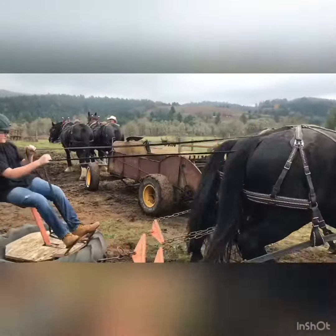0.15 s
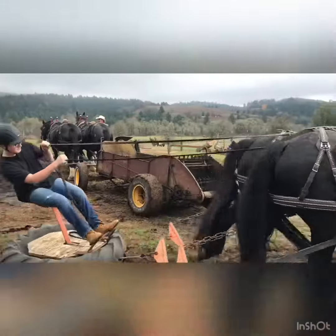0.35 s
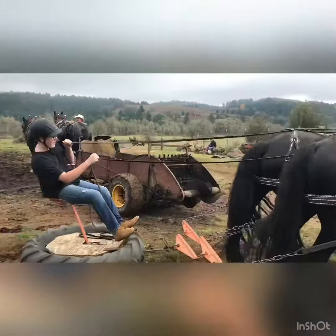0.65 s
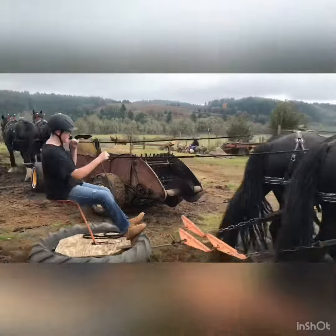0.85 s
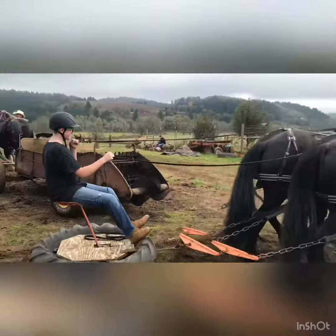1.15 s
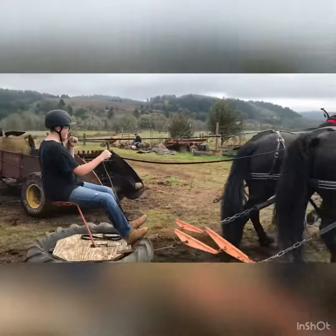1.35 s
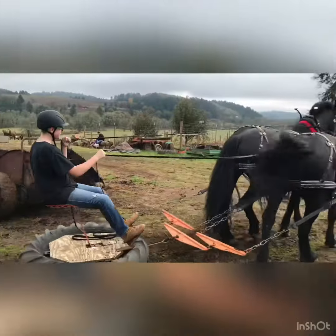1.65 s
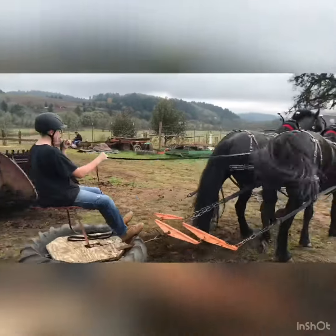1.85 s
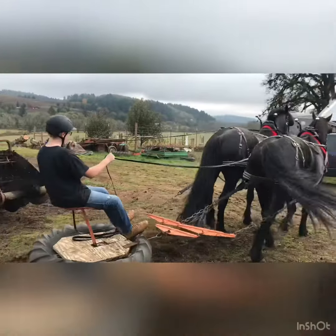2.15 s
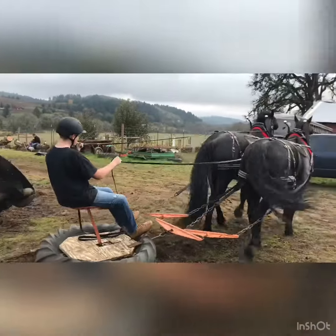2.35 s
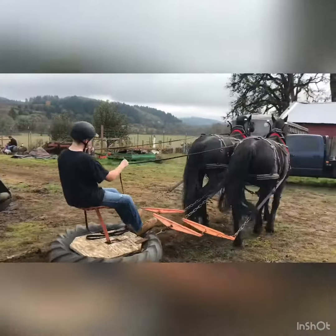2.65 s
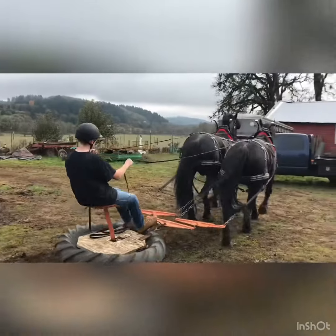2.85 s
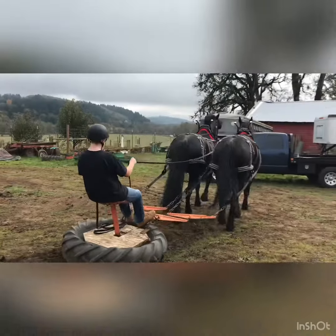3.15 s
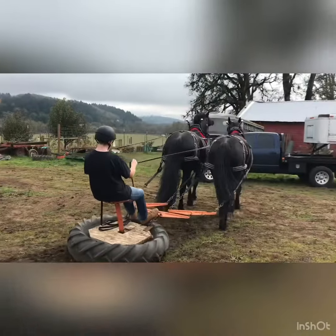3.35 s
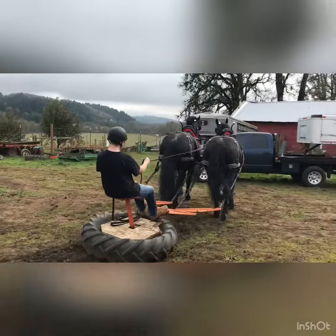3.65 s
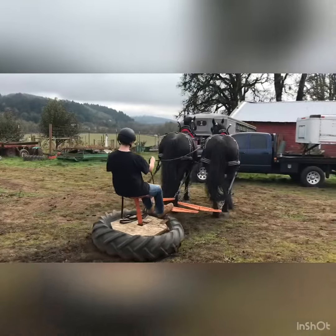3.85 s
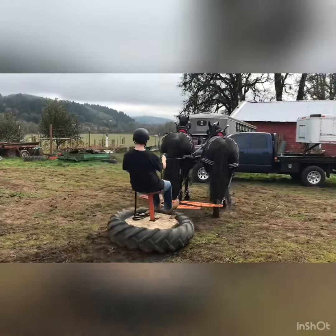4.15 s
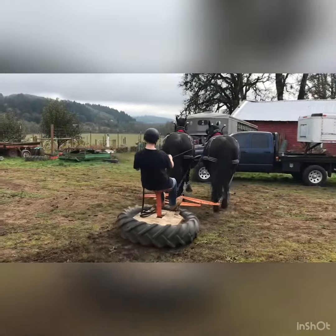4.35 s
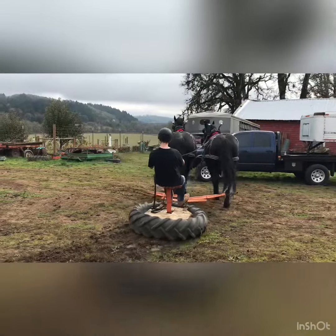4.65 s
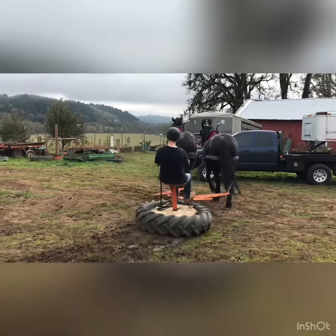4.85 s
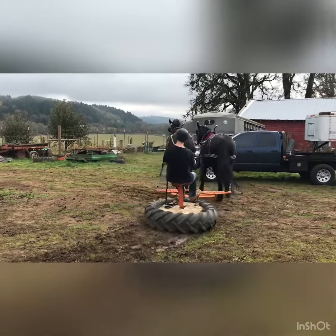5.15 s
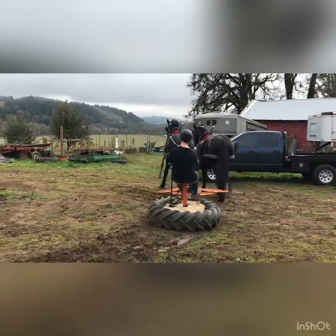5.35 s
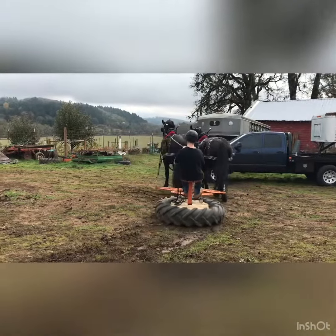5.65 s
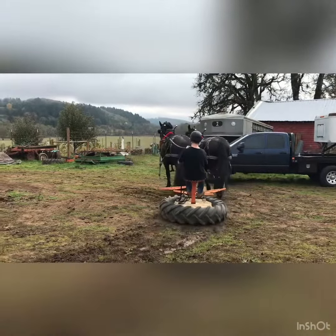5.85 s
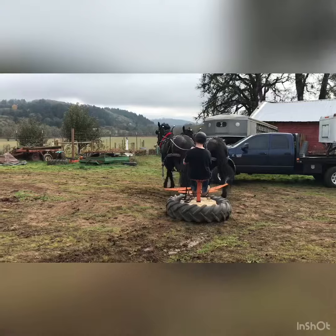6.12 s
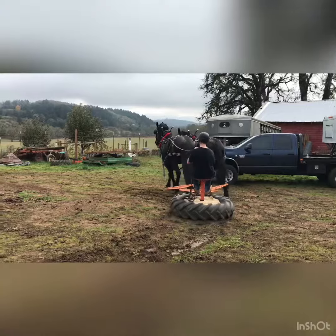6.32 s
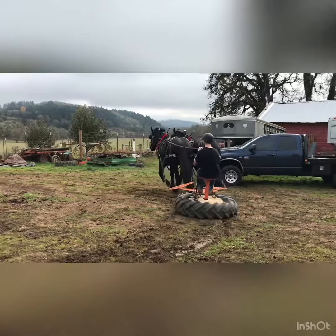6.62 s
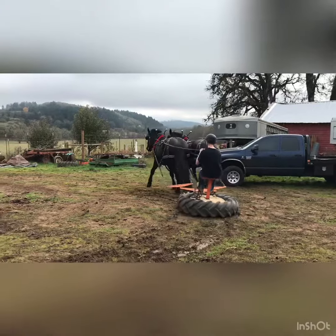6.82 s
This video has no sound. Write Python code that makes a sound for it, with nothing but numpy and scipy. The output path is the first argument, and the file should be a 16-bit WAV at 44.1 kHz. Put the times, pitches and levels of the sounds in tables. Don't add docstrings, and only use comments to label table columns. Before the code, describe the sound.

Loose steel bars and chain clank sharply and irregularly as a horse-drawn tyre sled rumbles and scrapes away over turf with soft hoof thumps.

```python
import sys
import numpy as np
from scipy import signal
from scipy.fft import rfft, irfft, next_fast_len
from scipy.io import wavfile
from scipy.ndimage import uniform_filter1d, map_coordinates

SR = 44100
rng = np.random.default_rng(int(sys.argv[2]) if len(sys.argv) > 2 else 0)


def linear_from_db(decibels):
    return 10 ** (np.asarray(decibels, float) / 20)


def wav_record(signal):
    frames = np.transpose(np.atleast_2d(signal))
    bounded = np.clip(frames, -1, 1)
    quanta = np.round(bounded * 32767).astype(np.int16)
    wavfile.write(sys.argv[1], SR, quanta)


N = 307818


def unit(x):
    return x / np.sqrt(np.mean(x ** 2) + 1e-20)


def along(points, hz):
    f, v = np.transpose(points)
    return np.interp(np.log(hz + 1), np.log(f + 1), v)


def wobble(rate_hz):
    knots = rng.standard_normal(int(N * rate_hz / SR) + 4)
    return map_coordinates(knots, [np.arange(N) * rate_hz / SR])


def filtered(x, response):
    m = next_fast_len(x.shape[-1] + 4096)
    spectrum = rfft(x, m) * response(np.fft.rfftfreq(m, 1 / SR))
    return irfft(spectrum, m)[..., :x.shape[-1]]


def fading(t, t60_s, rise_s):
    return linear_from_db(-60 * t / max(t60_s, .003)) * (1 - np.exp(-t / max(rise_s, 1e-5)))


def add(track, s, sound):
    part = track[round(s * SR):][:len(sound)]
    part += sound[:len(part)]


def rush(spectrum, patchy_db):
    z = signal.stft(rng.standard_normal(N), nperseg=512)[2]
    field = uniform_filter1d(rng.standard_normal(z.shape), 12, 0)
    field = uniform_filter1d(field, 6, 1)
    x = signal.istft(z * linear_from_db(patchy_db * unit(field)), nperseg=512)[1][:N]
    return unit(filtered(x, lambda hz: linear_from_db(along(spectrum, hz))))


def tyre():
    # t/s, tyre load/dB, brushed grass/dB
    drag = [(0, -40.5, -60.5), (.6, -41, -58.5), (1.2, -44.5, -62.5), (1.8, -42.5, -58.5), (2.2, -42, -60),
            (2.36, -45, -66), (2.8, -44, -62.5), (3.5, -44, -66.5), (4.35, -46, -72), (4.85, -48, -69),
            (5.5, -49.5, -76), (6.98, -47, -75.5)]
    # f/Hz, density/dB
    rumble_colour = [(25, -87), (45, -8), (75, 4), (98, -6.5), (113, -9), (156, -19.5), (220, -35.5),
                     (330, -100)]
    scrape_colour = [(76, -49), (130, -4), (208, -9.5), (460, -16.5), (941, -18), (2500, -29),
                     (3250, -33.5), (5500, -120)]
    hiss_colour = [(880, -25.5), (1500, -6.5), (4370, -1.5), (4970, -7), (6120, -4), (9280, -6),
                   (10500, -11), (11500, -9.5)]
    start_m, leaves_m_per_s = 5.6, 1.05
    t = np.arange(N) / SR
    s, *cols = np.transpose(drag)
    rumble_db, fine_db = [np.interp(t, s, c) for c in cols]
    far_db = -20 * np.log10(1 + leaves_m_per_s / start_m * t)
    scrape_db = -51.5 + 0.67 * (rumble_db - rumble_db.mean()) + 0.53 * far_db
    hiss_db = -56.5 + 0.19 * (fine_db - fine_db.mean()) + 1.075 * far_db

    jolt = wobble(13)
    rumble = linear_from_db(rumble_db + 1.8 * wobble(9.5)) * rush(rumble_colour, patchy_db=-0.7)
    scrape_gain = linear_from_db(scrape_db + 1.0 + 0.99 * jolt + 1.38 * wobble(60))
    scrape = scrape_gain * rush(scrape_colour, patchy_db=1.2)
    crackle = linear_from_db(1.28 * rng.exponential(size=N // 64 + 1).repeat(64)[:N])
    grass = crackle * rush(hiss_colour, patchy_db=.4)
    fine = filtered(grass, lambda f: 1 / (1 + (6500 / (f + 1)) ** 6))
    flutter = linear_from_db(.7 * jolt + 1.1 * wobble(53))
    hiss = flutter * (linear_from_db(hiss_db) * unit(grass - fine) + linear_from_db(fine_db + 3.0) * unit(fine))
    return rumble + scrape + hiss


def knocks():
    # t/s, peak/dB, f/Hz, cycles to -60 dB
    steel_touches = [(0.015, -37, 2210, 18), (.159, -44, 1200, 14), (.185, -40, 1600, 9),
                     (2.2089, -5, 1670, 11), (.63, -17, 1900, 13), (3.4238, -22, 2700, 10),
                     (5.9718, -13, 2200, 9), (1.4222, -36, 3600, 22), (3.584, -46, 2500, 14),
                     (2.2442, -9, 1700, 18), (3.4471, -22, 2500, 12), (4.5609, -29.5, 1190, 25),
                     (4.6445, -37, 3500, 7), (5.9859, -14.5, 1420, 12), (6.8371, -29, 1090, 13),
                     (3.0143, -33, 7060, 20), (5.5757, -48, 3800, 16), (6.785, -47, 3500, 17.5),
                     (1.609, -44, 2900, 30), (2.0288, -40, 3900, 18), (2.303, -42, 7000, 20),
                     (2.4, -35, 4000, 4), (3.1, -40, 3500, 30), (2.7017, -37, 3300, 5),
                     (2.715, -38, 930, 10), (2.725, -40, 3100, 20), (2.744, -43, 3600, 20),
                     (2.465, -42, 2200, 14), (2.475, -42, 1600, 20), (4.6, -34, 1730, 12),
                     (4.2, -36, 1000, 4), (2.8, -34, 8500, 8), (2.864, -44, 6500, 12)]
    # t/s, peak/dB, f/Hz
    slack_links = [(.58, -37, 940), (.609, -38, 930), (.717, -40, 4300), (.722, -39, 3390),
                   (.726, -38, 1910), (.731, -33, 1470), (.74, -32, 1800), (.748, -38, 2100),
                   (.774, -36, 1500), (.785, -43, 1350), (.794, -36, 2300), (.803, -35, 880),
                   (.819, -38, 2500), (0.8842, -34, 1430), (.89, -39, 2600), (.917, -44, 1900),
                   (.946, -45, 950)]
    # t/s, peak/dB, f/Hz
    clods = [(.221, -38, 400), (.58, -32, 230), (.735, -32, 240), (.733, -38, 580), (.912, -42, 450),
             (1.61, -36, 220), (1.628, -39, 420), (2.217, -35, 200), (2.45, -34, 200), (2.562, -43, 220),
             (2.735, -35, 380), (2.832, -39, 370), (2.836, -39, 210), (2.872, -45, 420), (2.985, -41, 200),
             (3.041, -39, 240), (3.345, -41, 400), (3.435, -43, 450), (3.691, -37, 260), (3.75, -43, 200),
             (3.945, -46, 200), (4.021, -41, 210), (4.562, -38, 420), (5.153, -42, 220), (5.934, -43, 200),
             (6.76, -45, 420)]
    touches = list(steel_touches)
    touches += [(*row, 30) for row in slack_links]
    touches += [(*row, 9) for row in clods]
    out, t = np.zeros(N), np.arange(SR // 20) / SR
    for s, db, hz, cycles in touches:
        add(out, s, linear_from_db(db + 0.5) * np.sin(2 * np.pi * hz * t) * fading(t, cycles / hz, .0001))
    return out


def link_rings():
    # t/s, level/dB, f/Hz, t60/s
    lone_links = [
        (.036, -38, 1330, .1),
        (.036, -37, 1733, .06),
        (.61, -41, 904, .08),
        (.82, -40, 1427, .09),
        (.886, -46, 1400, .3),
        (.886, -49, 759, .3),
        (3.563, -53, 5303, .22),
        (6.516, -53, 1373, .19),
        (6.516, -55, 2616, .2),
        (6.516, -58, 2492, .1),
    ]
    # t/s, level/dB, f/Hz, t60/s
    clank_modes = [(5.9708, -13, 3045, .08), (2.2445, -24, 3260, .09), (2.209, -30, 4465, .1),
                   (2.209, -26, 1680, .08), (3.4225, -20, 2060, .035), (3.423, -32, 3200, .05),
                   (3.446, -33, 2153, .09), (5.972, -27, 1150, .06), (6.01, -47, 4600, .2),
                   (6.02, -38, 1640, .12), (3.424, -49, 5420, .1), (5.9715, -24, 1660, .08),
                   (5.978, -31, 2917, .15), (5.98, -31, 1480, .16), (5.984, -24, 2636, .14),
                   (5.986, -33, 2565, .2), (5.986, -32, 1690, .16), (5.994, -36, 2840, .25),
                   (6.002, -38, 6043, .08), (6.04, -46, 3045, .2), (6.057, -52, 6043, .15),
                   (4.566, -28, 6029, .05), (4.566, -40, 7149, .06), (4.567, -33, 4264, .05),
                   (4.567, -37, 2183, .09), (4.573, -32, 1820, .035), (2.199, -44, 3040, .3)]
    # t/s, level/dB, f/Hz, t60/s
    more_clank_modes = [(2.209, -30, 3817, .12), (2.209, -35, 4587, .12), (2.245, -34, 619, .2),
                        (2.245, -39, 1432, .2), (2.245, -37, 1550, .2), (3.423, -42, 743, .1), (3.423, -32, 1825, .08),
                        (3.423, -39, 2546, .1), (3.423, -43, 3871, .1), (3.447, -41, 2762, .2), (3.447, -45, 1346, .2),
                        (3.447, -43, 1696, .2), (3.447, -53, 2632, .2), (3.447, -52, 4613, .2),
                        (4.566, -38, 4705, .09), (4.566, -37, 5265, .09), (4.566, -30, 7036, .06),
                        (4.566, -50, 11360, .13), (4.566, -54, 10034, .16), (4.566, -55, 11811, .17),
                        (5.971, -32, 7612, .1), (5.971, -36, 6412, .1), (5.971, -33, 3402, .1), (5.971, -37, 5814, .1),
                        (5.995, -37, 1836, .2), (6.06, -62, 4048, .5), (6.06, -62, 4194, .5), (6.25, -61, 2650, .25),
                        (6.1, -63, 1927, .4)]
    out, t = np.zeros(N), np.arange(SR // 5) / SR
    for rows in (lone_links, clank_modes, more_clank_modes):
        for s, db, hz, t60_s in rows:
            add(out, s, linear_from_db(db) * np.sin(2 * np.pi * hz * t) * fading(t, t60_s, .002))
    return out


def jingles(count):
    when, size, pitch = rng.random((count, 3)).T
    s = when * N / SR
    level_db = -59 - 1.5 * s - 6 * size
    return list(zip(s, level_db, 3200 * 2 ** (2 * pitch - 1)))


def ticks():
    # t/s, rms/dB, f/Hz
    grit = [(0.152, -42, 5330), (0.395, -44, 6320), (0.444, -39, 5060), (1.076, -45, 5860),
            (2.448, -46, 3600), (2.567, -46, 4870), (3.0145, -52, 7450), (4.255, -54, 7980),
            (4.644, -52, 3600), (5.83, -58, 6920)]
    rattle = [(0.562, -46, 8900), (0.715, -44, 3540), (0.786, -47, 2650), (0.884, -48, 2500),
              (1.4225, -49, 3800), (2.576, -54, 3600), (2.712, -52, 3300), (2.863, -54, 6810),
              (3.368, -49.5, 2370), (4.468, -52, 2640), (5.625, -64.5, 6130), (6.599, -48.5, 2130)]
    swish = [(1.175, -52.5, 5200), (2.7, -55.5, 5500), (2.83, -53, 8110)]
    buckle = [(0.725, -54, 3350), (3.057, -52.5, 4380), (3.422, -38, 3380), (3.684, -54.5, 4430),
              (3.748, -52, 4300), (4.081, -56.5, 8400), (4.081, -47, 5900), (4.93, -56.5, 4300),
              (6.058, -60, 11740), (6.4, -60, 4400), (6.476, -58, 4380)]
    taps = [(0.0362, -33.5, 1230), (0.795, -35, 1030), (0.916, -41, 1130), (0.949, -47, 810),
            (2.448, -43.5, 580), (2.738, -45.5, 530), (3.346, -43, 710), (4.016, -46, 1580),
            (5.576, -55, 1270), (6.329, -48, 841), (6.838, -50, 1060)]
    tumbles = [(0.578, -48, 935), (0.609, -56, 950), (0.722, -47, 1640), (0.733, -48, 1500),
               (0.778, -43, 1080), (0.815, -54, 1700), (0.884, -47.5, 1460), (1.041, -55.5, 1140),
               (2.47, -54.5, 1800), (2.833, -54, 950), (3.692, -65, 640)]
    # spread as share of f, t60/s, rise/s
    rattle_kind = (0.27, 0.053, 0.0017)
    kinds = [(grit, (0.39, 0.0098, 0.00056)), (rattle, rattle_kind), (swish, (0.42, 0.14, 0.0024)),
             (buckle, (0.04, 0.043, 0.0016)), (taps, (0.37, 0.022, 0.0011)),
             (tumbles, (0.35, 0.15, 0.0033)), (jingles(count=40), rattle_kind)]
    out, t = np.zeros(N), np.arange(SR // 5) / SR
    for rows, (spread, t60_s, rise_s) in kinds:
        shape = fading(t, t60_s, rise_s)
        for s, db, hz in rows:
            bell = lambda f: np.exp(-(np.log((f + 1) / hz) / (2 * max(spread, .03))) ** 2)
            grains = linear_from_db(3 * rng.standard_normal(len(t) // 90 + 1).repeat(90)[:len(t)])
            puff = shape * filtered(grains * rng.standard_normal(len(t)), bell)
            add(out, s, linear_from_db(db + 6.0) * puff * np.linalg.norm(shape) / np.linalg.norm(puff))
    return out


def hooves():
    # t/s, level/dB, f/Hz
    flat = [(0.222, -25, 79.7), (0.989, -36, 93), (1.476, -41, 63), (1.842, -47, 83), (2.932, -19.5, 81.4),
            (3.089, -46, 68.5), (3.217, -40.5, 77.5), (3.448, -38, 72.7), (3.697, -34.5, 73),
            (4.272, -49, 71.5), (4.721, -38.5, 72.5), (5.076, -42, 75.7), (5.148, -45, 96),
            (5.739, -38, 81.4), (6.097, -47, 75), (6.477, -46.5, 102.4)]
    toe = [(0.039, -35, 57.4), (0.373, -28.5, 74), (0.576, -36.5, 67), (0.729, -41, 58.6),
           (0.772, -31, 85.6), (0.928, -31, 77), (1.165, -37, 86), (1.985, -41, 75.5), (2.438, -41, 115),
           (2.714, -34.5, 87), (3.348, -39, 93)]
    out, t = np.zeros(N), np.arange(SR // 3) / SR
    swell = fading(t, 0.086, 0.016) * (1 - np.exp(-t / 0.013))
    for rows, slap_db in [(flat, -15), (toe, -4)]:
        for s, db, hz in rows:
            cycles = hz * (t + 0.004 * (1 - np.exp(-t / 0.0038)))
            ring = np.sin(2 * np.pi * cycles) * swell / swell.max()
            slap = filtered(rng.standard_normal(len(t)), lambda f: np.exp(-np.log((f + 1) / 280) ** 2 / 0.18))
            slap = linear_from_db(slap_db - 4.0) * unit(slap) * fading(t, 0.093, 0.0052)
            add(out, s, linear_from_db(db) * (1.76 * ring + slap))
    return out


def shiver(t):
    rate_hz, depth_db = 45, 1.5
    knots = rng.standard_normal(int(t[-1] * rate_hz) + 2)
    knots[0] = 0
    return linear_from_db(depth_db * np.interp(t * rate_hz, np.arange(len(knots)), knots))


def bar_ring(t, modes, onset_s, free_s):
    ring = np.zeros(len(t))
    for k, (hz, db, t60_s) in enumerate(modes):
        sign = (-1) ** k
        ring += sign * linear_from_db(db - 2.2) * np.sin(2 * np.pi * hz * t) * fading(t, t60_s, onset_s) * shiver(t)
    return ring * linear_from_db(-400 * np.maximum(t - free_s, 0))


def clustered(modes, f, width_hz, valley_db):
    return linear_from_db(valley_db) + sum(1 / (1 + ((f - hz) / width_hz) ** 2) for hz, _, _ in modes)


def clatter(t, modes, tone, t60_s, onset_s):
    colour = lambda f: linear_from_db(along(tone, f)) * clustered(modes, f, width_hz=50, valley_db=-5)
    noise = unit(filtered(rng.standard_normal(len(t)), colour))
    bright = filtered(noise, lambda f: f / np.hypot(f, 5000))
    dull = (noise - bright) * fading(t, t60_s, onset_s)
    crack = 1.5 * noise * fading(t, 0.012, onset_s / 5)
    return dull + bright * fading(t, .8 * t60_s, onset_s / 2) + crack


def swarm(t, tone, t60_s, count):
    pitch, size, life = rng.random((3, count, 1))
    hz = 1200 * 6 ** pitch
    gain = linear_from_db(along(tone, hz) - 10 * size) * np.sqrt(hz)
    rings = gain * np.sin(2 * np.pi * (hz * t + size)) * fading(t / (.5 + life), t60_s, 0)
    return rings.sum(axis=0) / np.sqrt(np.sum(gain ** 2) / 2)


def bars():
    # f/Hz, level/dB, t60/s
    ring_1 = [(1346, -44.8, 0.23), (1390, -21, 0.055), (1408, -44.9, 0.12), (1782, -32.4, 0.13),
              (2156, -49.7, 0.58), (2624, -37.4, 0.21), (3047, -44.7, 0.33), (3803, -48.3, 0.24),
              (4212, -53.1, 0.41), (4272, -43, 0.83), (5400, -43, 0.13)]
    ring_2 = [(883, -36, 0.12), (1357, -34, 0.17), (1408, -48.8, 0.42), (1785, -29, 0.2), (2148, -37, 0.2),
              (2476, -39.8, 0.12), (2800, -42.2, 0.12), (3031, -45.5, 0.23)]
    ring_3 = [(545, -31, 0.15), (1112, -27.9, 0.42), (1179, -24.5, 0.1), (1830, -14.5, 0.69),
              (2151, -6.1, 0.08), (2619, -26.9, 0.2), (3040, -12, 0.11), (3257, -21.7, 0.14),
              (3701, -22.0, 0.1), (4054, -23.5, 0.08), (4261, -24.3, 0.23), (5214, -36, 0.09),
              (6072, -33.4, 0.1), (7639, -39, 0.14)]
    ring_3_bounce = [(557, -34.1, 0.24), (934, -36.7, 0.22), (1115, -32, 0.36), (1184, -44.3, 0.23),
                     (1682, -26, 0.16), (1833, -26, 0.5), (2151, -20, 0.14), (2557, -39, 0.38),
                     (2627, -25, 0.14), (3036, -24, 0.14), (3709, -26.7, 0.11), (3828, -20.4, 0.07),
                     (4266, -28, 0.17), (4476, -28.8, 0.12)]
    ring_4 = [(1114, -32.5, 0.45), (1577, -33.0, 0.13), (1766, -40.0, 0.22), (1833, -43, 0.5),
              (2153, -30, 0.2), (2762, -48, 0.3), (3055, -52, 0.3), (3262, -44.0, 0.4), (3418, -34, 0.09),
              (4046, -44, 0.4), (4264, -42, 0.33), (6024, -45, 0.2)]
    ring_5 = [(904, -47.0, 0.42), (1359, -37, 0.16), (1822, -41.5, 0.17), (2151, -37, 0.55),
              (2624, -37.7, 0.22), (2821, -56.4, 0.3), (6030, -50, 0.2)]
    ring_6 = [(870, -32, 0.08), (1104, -52, 0.2), (1760, -29, 0.05), (2183, -43.5, 0.14),
              (3219, -40.6, 0.11), (4046, -46.8, 0.3), (4274, -48, 0.3), (5290, -52, 0.19),
              (5817, -46.1, 0.15), (6029, -50, 0.35), (6700, -57, 0.2), (7149, -45.7, 0.21),
              (10900, -58, 0.2), (13100, -56, 0.12)]
    ring_7 = [(1666, -35.9, 0.06), (1782, -38.8, 0.07), (2622, -39.6, 0.14), (3033, -39.8, 0.29),
              (3822, -33.8, 0.04), (4274, -40.8, 0.1), (4740, -38.8, 0.05), (5822, -52.3, 0.16)]
    ring_8 = [(907, -47, 0.25), (1150, -25, 0.16), (1553, -33, 0.25), (1710, -27, 0.1), (1841, -55, 0.9),
              (2155, -39, 0.38), (2568, -30, 0.15), (2580, -54, 0.9), (2641, -27, 0.08), (2850, -26, 0.15),
              (3033, -32, 0.09), (3055, -42, 0.32), (3262, -31, 0.36),
              (3712, -36, 0.3), (3806, -33.8, 0.17), (4268, -22, 0.17), (4280, -42, .38),
                   (4484, -31, 0.26), (4600, -36.8, 0.28), (5006, -37, 0.25), (5346, -27.5, 0.13),
                   (5367, -43, 0.38), (6043, -36, 0.27), (6300, -26, 0.08), (6885, -40.7, 0.24),
                   (7410, -29, 0.19)]
    # f/Hz, density/dB
    tone_1 = [(240, -43), (600, -6), (1100, -13), (1400, 1), (2020, -12), (6740, -18), (16000, -37)]
    tone_2 = [(240, -58), (400, -19), (1790, -7), (3370, -7), (16000, -31)]
    tone_3 = [(150, -52.5), (250, -17), (550, -13), (1800, -7), (3500, -11), (5000, -17), (6500, -15),
              (16000, -45.5)]
    tone_4 = [(240, -51), (400, -15), (2120, -15), (2320, -18), (3370, -14.5), (16000, -48)]
    tone_5 = [(240, -43), (400, -7), (1990, -19), (2880, -0.5), (3690, -13), (16000, -48)]
    tone_6 = [(240, -45.5), (400, -18), (1000, -11), (2800, -10), (7000, -8.5), (9000, -15), (11500, -21),
              (16000, -25.5)]
    tone_7 = [(240, -49.5), (1200, -7), (3070, -15), (8630, -25), (16000, -66)]
    tone_8 = [(120, -44), (220, -7), (600, -11), (1600, -4), (2050, -12), (2900, -9), (7700, -12.5),
              (11500, -18), (16000, -33)]
    # t/s, peak/dB, clatter t60/s
    blows_1 = [
        (0.63, -0.5, 0.065),
    ]
    blows_2 = [
        (1.61, -22.5, 0.09),
    ]
    blows_3 = [
        (2.209, 0.91, 0.099),
    ]
    blows_3_bounce = [
        (2.2443, -4, 0.135),
    ]
    blows_4 = [
        (3.423, -14.5, 0.18),
        (3.447, -17.5, 0.12),
    ]
    blows_5 = [
        (4.0804, -14.5, 0.097),
    ]
    blows_6 = [
        (4.562, -22, 0.087),
        (4.566, -11, 0.088),
        (4.571, -22, 0.16),
    ]
    blows_7 = [
        (5.935, -20.5, 0.15),
    ]
    blows_8 = [
        (5.97, -4, 0.17),
        (5.986, -13, 0.175),
    ]
    free_times_s = [.09, .09, .2, .18, .2, .12, .1, .2, .32]
    onsets_s = [.0005, .003, .0005, .0005, .001, .003, .003, .001, .0015]
    clanks = [(ring_1, tone_1, blows_1), (ring_2, tone_2, blows_2), (ring_3, tone_3, blows_3),
              (ring_3_bounce, tone_3, blows_3_bounce), (ring_4, tone_4, blows_4), (ring_5, tone_5, blows_5),
              (ring_6, tone_6, blows_6), (ring_7, tone_7, blows_7), (ring_8, tone_8, blows_8)]
    out, t = np.zeros(N), np.arange(SR // 2) / SR
    starts = [max(blows, key=lambda blow: blow[1])[0] for _, _, blows in clanks]
    ends = starts[1:] + [N / SR]
    for (modes, tone, blows), start, end, free_s, onset_s in zip(clanks, starts, ends, free_times_s, onsets_s):
        ring = bar_ring(t, modes, onset_s, free_s)
        add(out, start, ring * (t < end - start))
        for s, db, t60_s in blows:
            add(out, s, linear_from_db(db - 18.5) * clatter(t, modes, tone, t60_s, onset_s))
            links = linear_from_db(-13) * swarm(t[:SR // 4], tone, 1.3 * t60_s, count=60)
            add(out, s, linear_from_db(db - 17.5) * links)
    return out


def yard(x):
    # f/Hz, t60/s
    decay = [(300, .35), (3000, .55), (10000, .25)]
    hz, t, z = signal.stft(rng.standard_normal(SR // 2), SR, nperseg=256)
    tail = signal.istft(z * linear_from_db(-60 * t / along(decay, hz)[:, None]), SR, nperseg=256)[1]
    late = np.pad(x, (700, 0))
    return signal.fftconvolve(late, tail / np.linalg.norm(tail))[:N]


def scene():
    drag = tyre()
    steel = knocks() + link_rings() + ticks() + bars()
    echo = linear_from_db(-32) * yard(steel)
    return (steel + echo + hooves() + drag)[None]


def top_cut(x):
    return signal.sosfilt(signal.butter(12, 16500, fs=SR, output="sos"), x)


def record(dry):
    soft = dry / (1 + np.abs(dry / .8) ** 4) ** (1 / 4)
    mix = filtered(soft, lambda hz: hz < 15830)
    return top_cut(mix)


dry = scene()
out = record(dry)
wav_record(out)
```